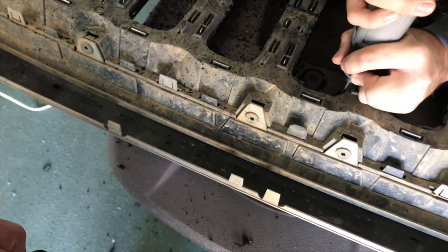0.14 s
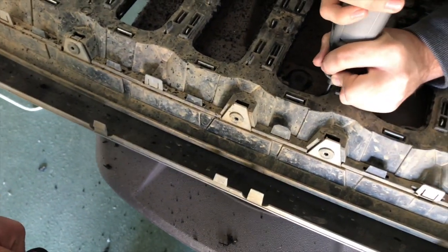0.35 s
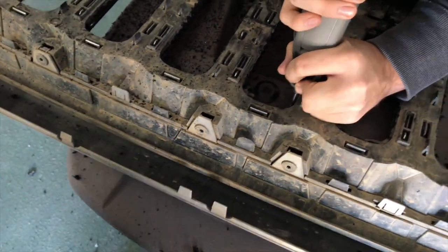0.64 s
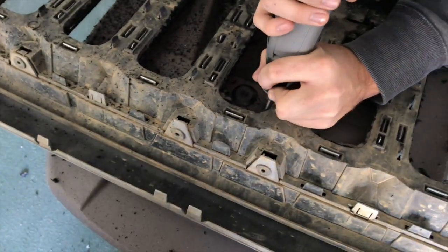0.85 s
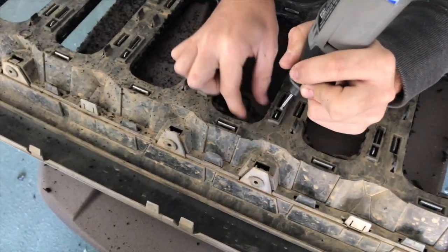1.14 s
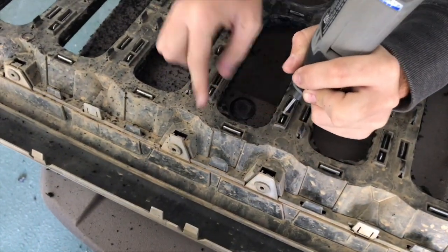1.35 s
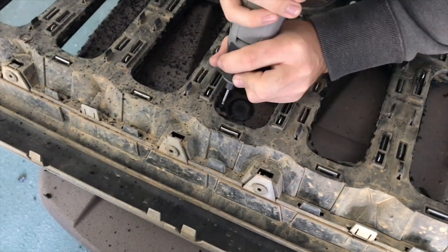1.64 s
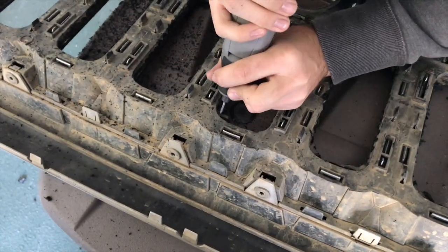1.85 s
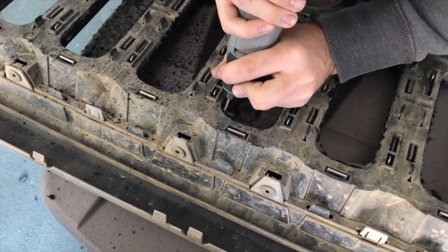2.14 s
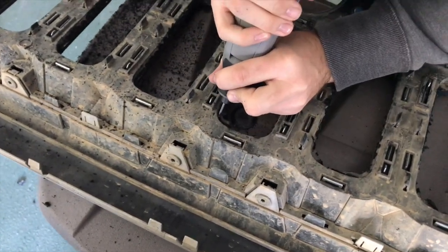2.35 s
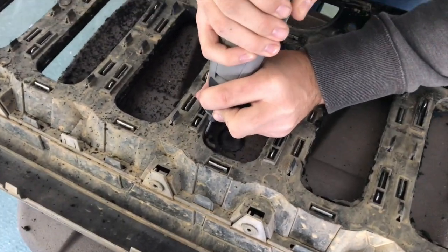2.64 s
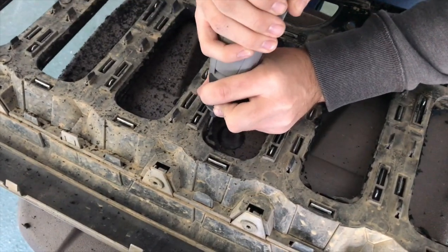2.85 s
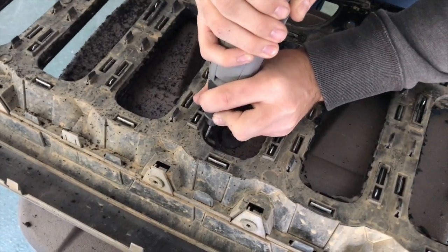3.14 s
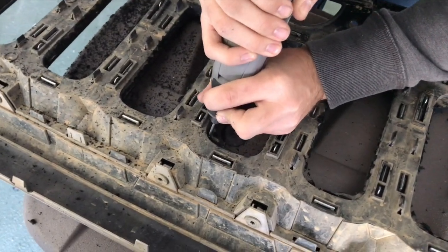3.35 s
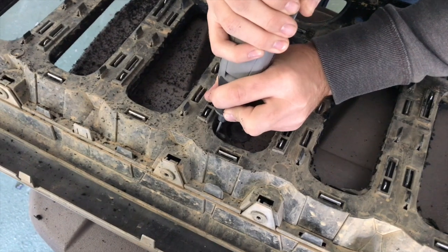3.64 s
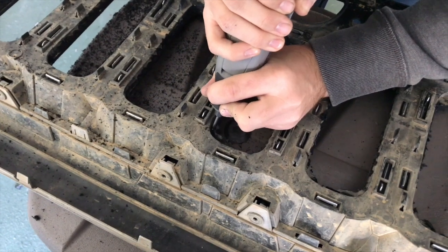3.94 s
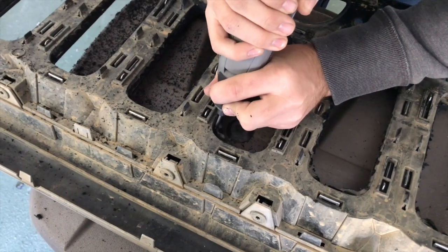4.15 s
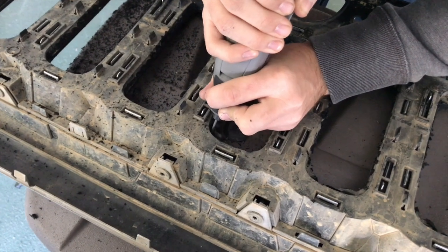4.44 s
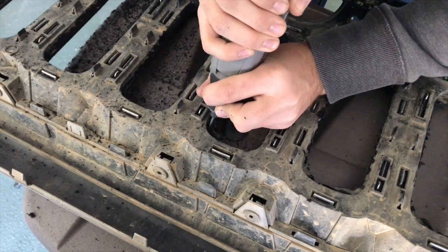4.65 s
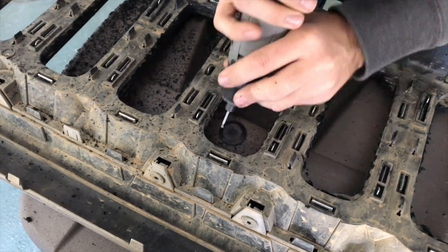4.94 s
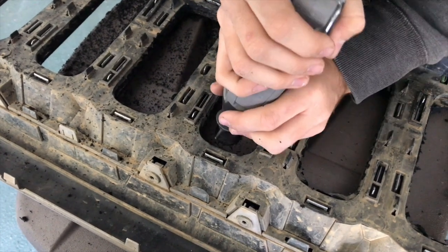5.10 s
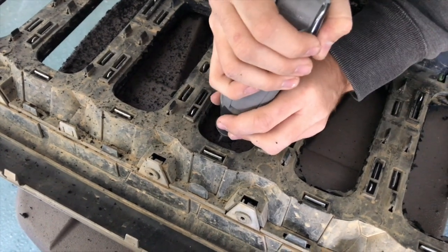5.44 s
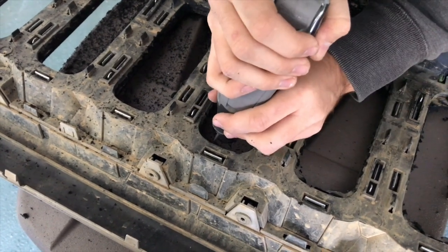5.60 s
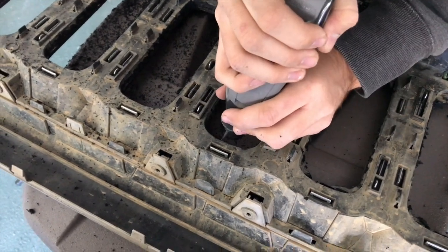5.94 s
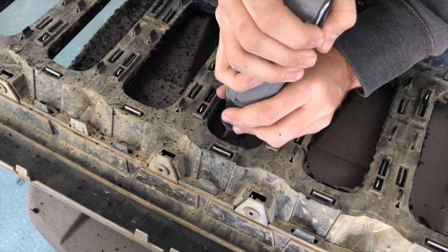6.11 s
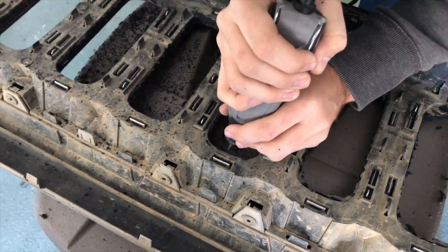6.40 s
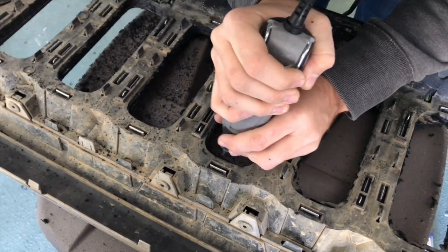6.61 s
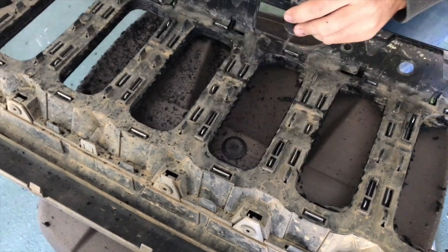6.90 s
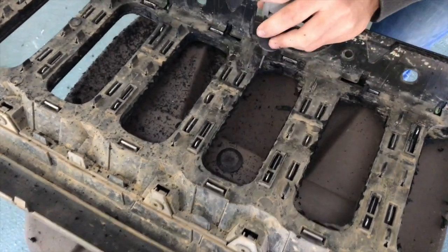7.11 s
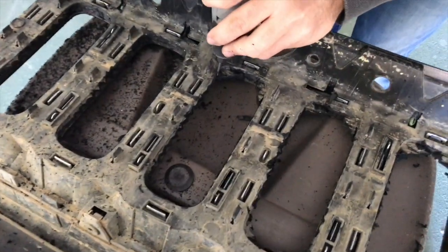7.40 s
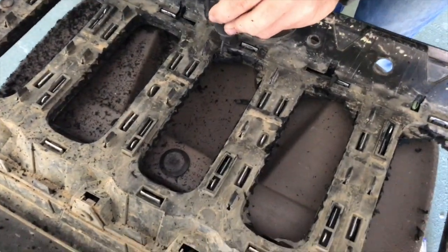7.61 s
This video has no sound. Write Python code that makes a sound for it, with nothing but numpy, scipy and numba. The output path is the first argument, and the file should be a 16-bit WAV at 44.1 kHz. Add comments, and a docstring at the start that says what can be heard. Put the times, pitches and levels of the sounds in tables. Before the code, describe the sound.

Close to the microphone in a dry workshop, a small rotary tool whines near 1.6 kHz, climbing toward 1.8 kHz, with bright air hiss from its vents. From 0 to 1 second the bur makes short, shrill, rasping bites on plastic. It runs free until about 1.9, the hiss more exposed. From 1.9 to 4.7 it grinds almost continuously: loud, harmonic-rich squealing chatter with gritty chip spray, the pitch sagging under load, and hard panel knocks, clearest around 3.5 to 3.9. It frees until 5.3, then makes shorter, cleaner bites until 6.7, with soft low bumps. A hard knock lands at 7.0 over hiss and whine; from 7.3 to 7.8 come the final, very loud bites. Loud cuts duck the hiss, which swells back afterwards. Quiet room hum and faint rising tones around 2.2-3.1 and 4.9-5.7 sit behind.

```python
"""A rotary tool whines and hisses while its bur bites a plastic panel, close by in a workshop.
The whine follows the motor's speed; the hiss is air from the vents, shaped by the hands.
Each bite chatters in step with the whine, squeals, tears off chips and drags the speed down.
Now and then the panel is knocked, and soft low bumps come with some bites.
Behind it lie a quiet room hum and faint rising tones."""
import sys
import numpy as np
from scipy import signal
from scipy.fft import rfft, irfft, next_fast_len
from scipy.io import wavfile
from scipy.ndimage import uniform_filter1d
from numba import njit

SR = 44100
rng = np.random.default_rng(int(sys.argv[2]) if len(sys.argv) > 2 else 0)


def int16_out(signal):
    """Quantize to a 16-bit WAV file."""
    q = np.round(np.clip(np.atleast_2d(signal).T, -1, 1) * 32767)
    wavfile.write(sys.argv[1], SR, q.astype(np.int16))


N = 342216
TIME = np.arange(N) / SR  # seconds


def undb(db):
    """Turn decibels into a gain."""
    return 10 ** (np.asarray(db) / 20)


def unit(x):
    """Scale to an average (rms) level of 1."""
    return x / np.sqrt(np.mean(x ** 2))


def curves(table):
    """Join the points in each column of a timed table by straight lines."""
    seconds, *columns = np.transpose(table)
    return [np.interp(TIME, seconds, column) for column in columns]


def colour(x, points):
    """Filter by a spectrum of (Hz, dB) points, joined on a logarithmic pitch scale."""
    hz, db = np.transpose(points)
    size = next_fast_len(N + 4096)
    bins_hz = np.maximum(np.fft.rfftfreq(size, 1 / SR), 1)
    gain = undb(np.interp(np.log(bins_hz), np.log(hz), db))
    return irfft(rfft(x, size) * gain, size)[:N]


def noise(points):
    """Random noise with the given spectrum, at rms 1."""
    return unit(colour(rng.standard_normal(N), points))


def resonate(x, hz, width_hz):
    """Ring at one pitch, with gain 1 at its centre."""
    b, a = signal.iirpeak(hz, hz / width_hz, fs=SR)
    return signal.lfilter(b, a, x)


def lowpass(x, hz, order=2):
    """Keep what lies below a pitch."""
    return signal.sosfilt(signal.butter(order, hz, fs=SR, output="sos"), x)


def walk(rate):
    """Wander at random, with about `rate` turns a second and rms 1."""
    points = rng.standard_normal(N // 4)
    return unit(np.interp(TIME * rate, np.arange(N // 4), points))


@njit
def sweep(x, hz, width):
    """Band-pass with a moving centre, gain 1 there; width is a share of the centre."""
    y, band, low = np.empty(len(x)), 0., 0.
    for i in range(len(x)):
        g = np.tan(np.pi * hz[i] / SR)
        v = (band + g * (x[i] - low)) / (1 + g * (g + width))
        band, low, y[i] = 2 * v - band, low + 2 * g * v, width * v
    return y


# The low room hum's colour. Each row: pitch in Hz, relative level in dB.
SHOP_SPECTRUM = [(40, -52), (100, -28), (150, -18), (195, -0.5), (265, -7), (345, 0), (430, -8),
                 (2000, -17.5)]


def room_hum():
    """The workshop's quiet hum: coloured noise whose level wanders slowly."""
    return undb(-41 + 2.34 * walk(4.024)) * noise(SHOP_SPECTRUM)


# Faint rising tones.
# Each row: start in seconds, end in seconds, first pitch in Hz, last pitch in Hz, rms level in dB.
RISING_HUMS = [(2.178, 3.111, 507, 532.7, -47), (4.88, 5.7, 202, 217.6, -48.5)]


def rising_hums(fade_s=0.1):
    """Faint pure tones that creep up in pitch, fading out four times as slowly as they fade in."""
    out = 0
    for start, end, first_hz, last_hz, db in RISING_HUMS:
        gate = np.clip(np.minimum(TIME - start, (end - TIME) / 4) / fade_s, 0, 1)
        hz = np.interp(TIME, (start, end), (first_hz, last_hz))
        tone = np.sin(2 * np.pi * np.cumsum(hz) / SR)
        out = out + gate * undb(db + 3) * tone  # 3 dB turns the rms level into a peak
    return out


def workshop(x, t60_s=0.14, wet_db=-19):
    """A short, weak tail from the walls: decaying noise, taking t60_s to fall by 60 dB."""
    age = TIME[:SR // 2]
    fade = np.exp(-np.log(1000) * age / t60_s)
    tail = rng.standard_normal(len(age)) * fade * (age > .004)
    tail = lowpass(tail, 6800, order=1)
    tail = tail / np.sqrt(np.sum(tail ** 2))
    return x + undb(wet_db) * signal.fftconvolve(x, tail)[:N]


def bursts(table, spectrum, t60_s, rise_s):
    """Bursts of coloured noise that start fast and take about t60_s to die away by 60 dB."""
    envelope = np.zeros(N)
    for s, db in table:
        age = np.maximum(TIME - s, 0)
        rise = 1 - np.exp(-age / rise_s)
        envelope += undb(db) * rise * np.exp(-np.log(1000) * age / t60_s)
    return envelope * noise(spectrum)


# Soft low bumps during some bites. Each row: start in seconds, relative level in dB.
LOW_BUMPS = [(0.905, -37), (0.957, -36), (4.66, -35), (5.43, -35), (6.012, -33), (6.231, -28.5),
             (6.284, -32.5), (7.569, -32)]


def low_bumps():
    """Soft low bumps, mostly below 300 Hz, during some bites: short bursts of bass noise."""
    bass = [(30, -2), (220, -1), (700, -33)]
    return undb(6) * bursts(LOW_BUMPS, bass, t60_s=0.084, rise_s=.005)


# Hard knocks on the panel. Each row: start in seconds, relative level in dB.
HARD_KNOCKS = [(2.303, -29), (3.271, -28), (3.493, -18), (3.752, -21), (3.86, -21), (4.07, -27),
               (4.78, -30.5), (5.481, -26.5), (6.085, -27.5), (6.2, -28), (6.545, -30), (6.869, -29),
               (7.03, -14.5)]
# The panel's colour when knocked. Each row: pitch in Hz, relative level in dB.
PANEL_SPECTRUM = [(100, -39), (350, -4.5), (750, 9), (1500, 2), (2500, -3.5), (16000, -23)]


def knocks():
    """Hard, quickly damped knocks ring the panel's middle: short bursts of coloured noise."""
    return bursts(HARD_KNOCKS, PANEL_SPECTRUM, t60_s=.09, rise_s=.001)


# Bites of the bur into the plastic. Each row: start in seconds, end in seconds,
# relative level in dB, drag in Hz that the whine would lose if the bite lasted.
BITES = [(0.0, 0.069, -21.0, 0.0), (0.095, 0.196, -21, 0.0), (0.21, 0.239, -20.0, 2.0),
         (0.284, 0.487, -24, 15.0), (0.52, 0.557, -19.5, 2.0), (0.62, 0.673, -17.5, 8.0),
         (0.754, 0.832, -15.5, 29.0), (0.846, 0.985, -15.5, 11.0), (1.88, 1.998, -20, 4.0),
         (2.006, 2.123, -14.5, 52.0), (2.148, 2.236, -14, 78.0), (2.256, 2.437, -19.5, 73.0),
         (2.443, 2.775, -21.0, 77.0), (2.832, 2.869, -13.0, 21.0), (2.906, 3.106, -10.5, 69.0),
         (3.124, 3.271, -15.5, 53.0), (3.291, 3.432, -17.5, 81.0), (3.442, 3.636, -11.0, 132.0),
         (3.7, 3.857, -12, 124.0), (3.86, 3.945, -11.5, 175.0), (3.958, 4.086, -11.5, 102.0),
         (4.095, 4.239, -12.5, 75.0), (4.25, 4.41, -14.5, 54.0), (4.432, 4.639, -14.0, 105.0),
         (4.667, 4.741, -9, 122.0), (4.841, 4.855, -12.5, 0.5), (5.264, 5.33, -15, 33.0),
         (5.387, 5.417, -18.0, 9.0), (5.424, 5.44, -9.5, 9.0), (5.469, 5.683, -16, 37.0),
         (5.748, 5.785, -14.5, 64.0), (5.807, 5.877, -16, 32.0), (5.906, 5.956, -18.5, 35.0),
         (5.989, 6.037, -17, 27.0), (6.083, 6.171, -14.5, 56.0), (6.186, 6.332, -17, 55.0),
         (6.427, 6.595, -17, 48.5), (6.626, 6.688, -16, 84.0), (7.288, 7.442, -7, 98),
         (7.45, 7.669, -11.5, 130.5), (7.691, 7.777, -15.5, 84)]
# The motor: whine pitch at first and running free, time to spin up and to answer a load.
START_HZ, FREE_HZ = 1595.8, 1822.8
SPIN_UP_S, INERTIA_S = 1.241, 0.134


def speed():
    """Whine pitch in Hz: the motor nears its free speed, and bites drag it down through inertia."""
    free_hz = FREE_HZ - (FREE_HZ - START_HZ) * np.exp(-TIME / SPIN_UP_S)
    drag = sum(drag_hz * ((TIME > start) & (TIME < end)) for start, end, _, drag_hz in BITES)
    keep = np.exp(-1 / (INERTIA_S * SR))
    return free_hz - signal.lfilter([1 - keep], [1, -keep], drag)


# Air and whine as the hands turn and shade the vents. Each row: time in seconds,
# relative hiss level in dB, pitch of the hiss peak in Hz, relative whine level in dB.
VENTS = [(0, -23.5, 5500, -28.5), (0.85, -23, 4860, -36), (1.2, -22, 4450, -29), (1.57, -19.5, 4240, -29.5),
         (1.82, -20, 5770, -35), (2.15, -20.5, 5800, -23), (2.8, -19.5, 5760, -31),
         (3.9, -20.5, 5600, -27.5), (4.9, -20.5, 5704, -31.5), (5.2, -18, 5120, -26.5),
         (5.5, -24, 5743, -29), (6.65, -24, 5716, -30.5), (6.8, -22.5, 7520, -36), (7.2, -22, 7210, -39),
         (7.76, -26.5, 6020, -32)]
# Colour of the air before that peak is added. Each row: pitch in Hz, relative level in dB.
AIR_SPECTRUM = [(60, -60), (200, -22), (1800, -16.5), (2300, -3.5), (3200, -8), (3750, 0.5), (7000, -1),
                (8000, -2.5), (10000, -0.5), (12500, -1.5), (16000, -2)]


def motor(phase, pitch_hz, overtones=((2, -37), (8, -32.5)), fade_db_per_hz=0.1):
    """The clean whine with thin (multiple, dB) overtones, and air rushing from the vents."""
    hiss_db, peak_hz, whine_db = curves(VENTS)
    whine = undb(whine_db + 4.0 + .5 * walk(49)) * np.sin(phase)
    slow_db = fade_db_per_hz * (FREE_HZ - pitch_hz)  # the overtones come out near full speed
    for multiple, db in overtones:
        level = undb(db - slow_db + 2 * walk(25)) * np.sqrt(2)
        whine = whine + level * np.sin(multiple * phase + .3 * walk(80))
    air = noise(AIR_SPECTRUM)
    # the gap between hands and panel favours one band of the hiss and moves with them
    air = unit(air + .9 * sweep(air, peak_hz, .3))
    return whine + undb(hiss_db + 0.5 + 1.23 * walk(20)) * air


UPRIGHT_FROM_S, UPRIGHT_TO_S = 5.0, 7.0


def is_upright(s):
    """Whether the tool is held upright at that time, not slanted."""
    return (s > UPRIGHT_FROM_S) & (s < UPRIGHT_TO_S)


# Skids of the bur over the surface, with a rasp.
# Each row: start in seconds, end in seconds, relative level in dB.
SKIDS = [(0.57, 0.605, -23.5), (0.677, 0.722, -20), (2.766, 2.778, -18.5), (3.353, 3.426, -23),
         (5.704, 5.739, -19.5), (6.714, 6.72, -22), (7.228, 7.28, -29)]
SKID_SHRILL_DB, SKID_ROUGH = 5.5, 0.52
# Treble of an ordinary bite. Each row: time in seconds, shrillness in dB.
SHRILLNESS = [(0.5, 0.5), (1.95, -8), (2.25, 6), (2.5, 0.5), (2.85, -2.5), (4.7, -3), (5.4, -2), (6.6, 5),
              (7.3, 1), (7.6, 4.5)]
# An ordinary bite; louder and deeper ones are duller, louder ones cleaner, upright ones cleaner too.
BITE_DB, BITE_ROUGH = -16, 0.16
DULL_DB_PER_DB, DULL_DB_PER_HZ, CLEAN_PER_DB = 0.48, 0.06, 0.01
UPRIGHT_ROUGH_SHARE = 0.44


def touches():
    """List each bite and skid as (start s, end s, level dB, shrillness dB, roughness)."""
    rows = [(start, end, db, SKID_SHRILL_DB, SKID_ROUGH) for start, end, db in SKIDS]
    for start, end, db, drag_hz in BITES:
        louder_db = db - BITE_DB
        ordinary_db = np.interp(start, *np.transpose(SHRILLNESS))
        shrill_db = ordinary_db - DULL_DB_PER_DB * louder_db - DULL_DB_PER_HZ * drag_hz
        rough = BITE_ROUGH - CLEAN_PER_DB * louder_db
        if is_upright(start):
            rough = rough * UPRIGHT_ROUGH_SHARE
        rows.append((start, end, db, shrill_db, rough))
    return rows


def contact(grab_s=0.0025, release_s=0.0062, sag_db=2.0, approach_s=0.046, leave_s=0.02, graze_db=-16):
    """Force, shrillness and roughness over time: each touch grazes, grabs, sags and lets go."""
    force, weight, shrill, rough = np.zeros((4, N))
    for start, end, db, shrill_db, roughness in touches():
        near = slice(max(int((start - .15) * SR), 0), int((end + .1) * SR))
        t = TIME[near]
        grab = grab_s * (1 + (end - start) / 0.06)  # long bites are eased in, short ones snatch
        firm = (1 + np.tanh(2 * (t - start) / grab)) * (1 + np.tanh(2 * (end - t) / release_s)) / 4
        # light grazing just before and after the firm touch
        away = np.maximum(np.maximum((start - t) / approach_s, (t - end) / leave_s), 0)
        gate = np.maximum(firm, undb(graze_db) * np.exp(-away ** 2))
        progress = np.clip((t - start) / max(end - start, .005), 0, 1)
        push = gate * undb(db + sag_db * (1.0 - progress))
        force[near] = np.maximum(force[near], push)
        # overlapping touches share the tone by their strength
        weight[near] += gate
        shrill[near] += gate * shrill_db
        rough[near] += gate * roughness
    weight += 1e-9  # avoids dividing by zero
    return force, shrill / weight, np.clip(rough / weight, 0, 1)


def low_rumble(force, patchy_db=7, top_hz=110):
    """Faint, patchy low noise that swells with the force of the bites."""
    rumble = unit(lowpass(rng.standard_normal(N), top_hz))
    return undb(-47.5 + patchy_db * walk(24)) * force * rumble


# Colour of the chip spray. Each row: pitch in Hz, relative level in dB.
CHIP_SPECTRUM = [(60, -80), (500, 4.5), (1900, 1), (2400, 3.5), (6500, 12), (9000, 6), (15500, 6)]
# High resonances of the bur and its shank.
# Each row: pitch in Hz, width in Hz of each of two passes, relative level in dB.
SHANK = [(13670, 380, -8), (15260, 200, -6)]


def chips(phase, force, shrill_db, rough, upright, grain_db=3):
    """Plastic tears off in a spray of grains, once a cycle; sideways cuts ring the shank."""
    once_a_cycle = 1 + .5 * np.cos(phase)
    grains = rng.standard_normal(N) * undb(grain_db * walk(900)) * once_a_cycle
    spray = unit(colour(grains, CHIP_SPECTRUM)) * (0.036 + rough) * undb(0.22 * shrill_db)
    ring = 0
    for hz, width_hz, db in SHANK:
        ring = ring + undb(db) * resonate(resonate(grains, hz, width_hz), hz, width_hz)
    ring_db = np.where(upright, -15, -5) + 0.53 * shrill_db
    return force * (undb(1.5) * spray + undb(ring_db) * unit(ring) * (0.31 + rough))


# Chatter harmonics with the tool slanted and upright.
# Each row: multiple of the whine pitch, relative level in dB.
SLANTED = [(1, -10), (2, -5.5), (3, 1), (4, 2), (5, -4), (6, -9.5), (7, -11), (8, -4), (9, -2)]
UPRIGHT = [(1, -9), (2, -6.5), (3, 1.5), (4, 0), (5, -8), (6, -3), (7, -1.5), (8, 2)]


def squeal(phase, force, shrill_db, rough, upright, flicker_db=4.0, flutter_db=2.5,
           shrill_share=0.74, shrill_from_hz=6500, shrill_full_hz=11000):
    """The bur strikes once a cycle; uneven strikes smear the upper harmonics most."""
    phase = phase + (.15 + rough) * walk(60)
    phase = phase + (.03 + .6 * rough ** 1.4) * walk(330)
    # slanting the bur lifts the top harmonics
    shrill_db = shrill_db + np.where(upright, 1.5, 6)
    slanted, steep = np.transpose(SLANTED), np.transpose(UPRIGHT)
    out = 0
    for k in range(1, len(SLANTED) + 1):
        db = np.where(upright, np.interp(k, *steep, right=-14), np.interp(k, *slanted))
        # how far this harmonic lies into the treble, from 0 to 1
        treble = np.clip((k * START_HZ - shrill_from_hz) / (shrill_full_hz - shrill_from_hz), 0, 1)
        db = db + shrill_share * treble * shrill_db
        db = db + flicker_db * np.tanh(walk(45)) * (0.77 + 2 * rough)
        db = db + flutter_db * walk(260)
        # the moving contact point shifts each harmonic's phase, so the lowest beats with the whine
        shift = rng.uniform(0, 2 * np.pi) + walk(24) / k
        out = out + undb(db) * np.sin(k * phase + shift)
    return undb(-3) * force * out


def ringing(chatter, hz=3290, width_hz=74, level_db=1.5):
    """A narrow resonance that the chatter excites when a harmonic passes its pitch."""
    return undb(level_db) * resonate(chatter, hz, width_hz)


def scene():
    """Tool, cut and panel over the workshop's hum, the same in both ears."""
    pitch_hz = speed()
    phase = 2 * np.pi * np.cumsum(pitch_hz) / SR
    upright = is_upright(TIME)
    force, shrill_db, rough = contact()
    force = force * undb(1.5 + 3.0 * np.tanh(walk(70)))  # the bur bounces in the hand
    chatter = squeal(phase, force, shrill_db, rough, upright)
    chatter = chatter + ringing(chatter)
    cut = chatter + chips(phase, force, shrill_db, rough, upright) + low_rumble(force)
    # a fast, shallow flutter at 480 Hz puts weak sidebands round every line
    flutter = 1 + .07 * np.sin(2 * np.pi * 480 * TIME)
    tool = (cut + motor(phase, pitch_hz)) * flutter
    mono = workshop(tool + knocks() + low_bumps()) + rising_hums() + room_hum()
    return np.array([mono, mono])


def limit(x, top_db=-6.5, strength=0.97, release_s=0.041):
    """Gain control: loud bites duck everything, and the hiss swells back after them."""
    power = uniform_filter1d(x[0] ** 2, size=256) + 1e-12
    # hold each peak of the level, then let it fall steadily in dB
    fall = TIME / release_s
    held = np.exp(np.maximum.accumulate(np.log(power) / 2 + fall) - fall)
    return x * np.minimum(undb(top_db) / held, 1) ** strength


def record(dry):
    """Gain control, clipping of the loudest peaks, and a steep cut above 15700 Hz."""
    clipped = np.clip(limit(dry), -1, 1)
    top = signal.ellip(12, .2, 70, 15700, fs=SR, output="sos")
    return signal.sosfilt(top, clipped)


dry = scene()
out = record(dry)
int16_out(out)
```